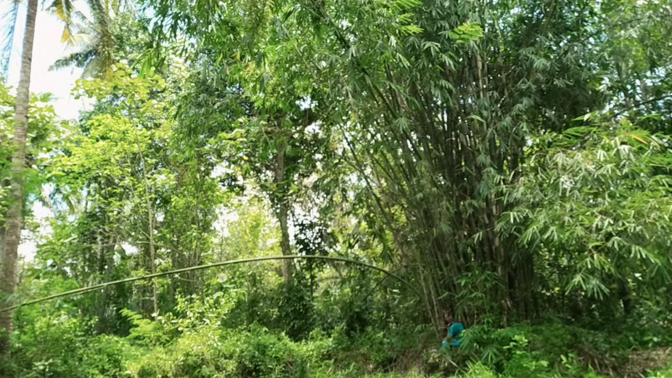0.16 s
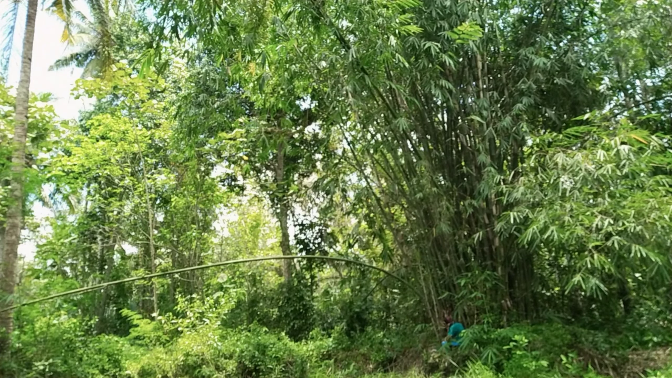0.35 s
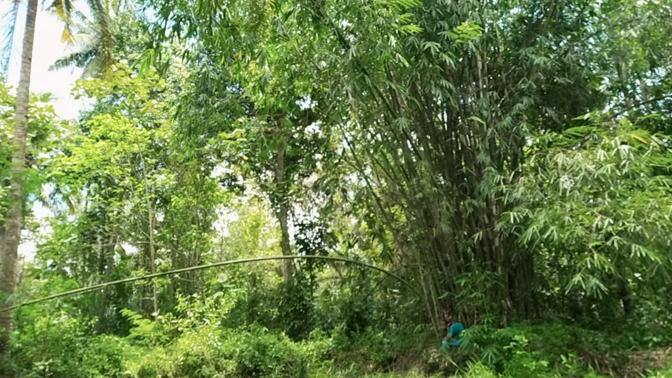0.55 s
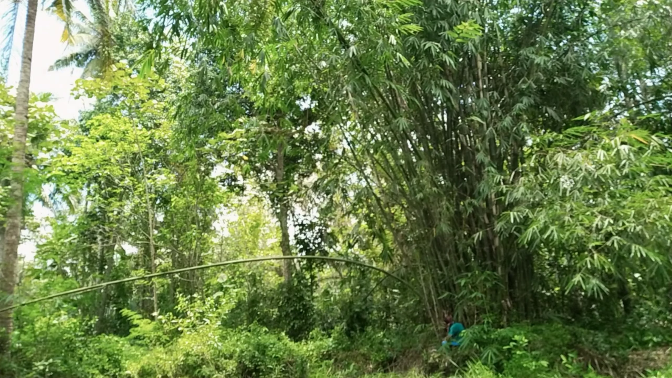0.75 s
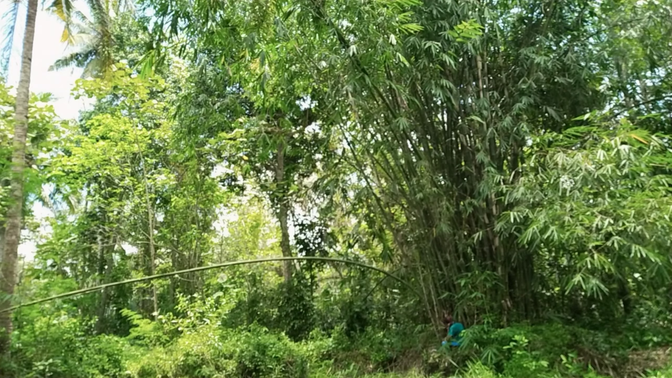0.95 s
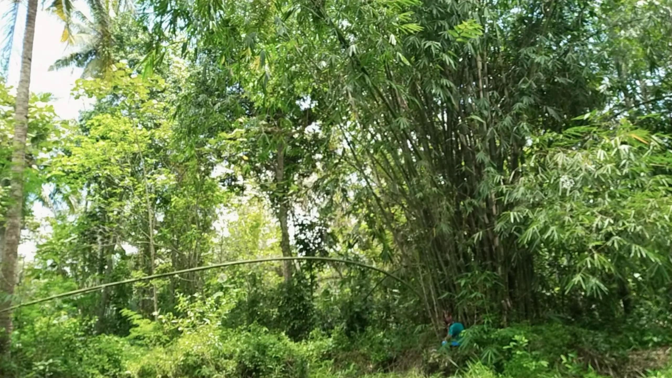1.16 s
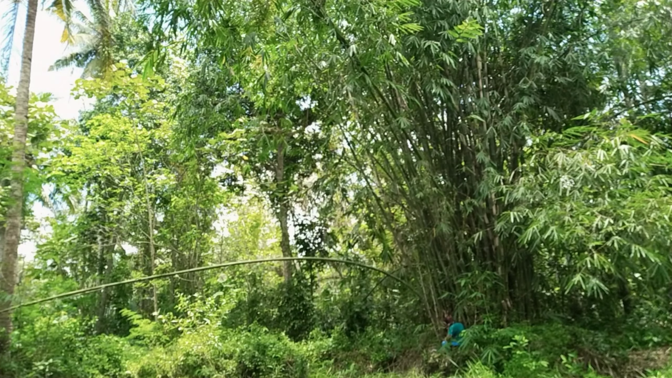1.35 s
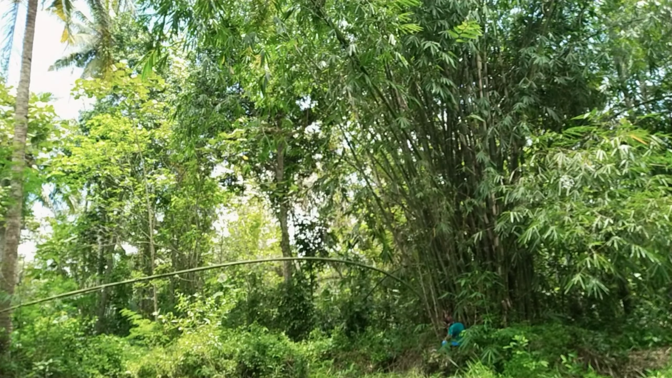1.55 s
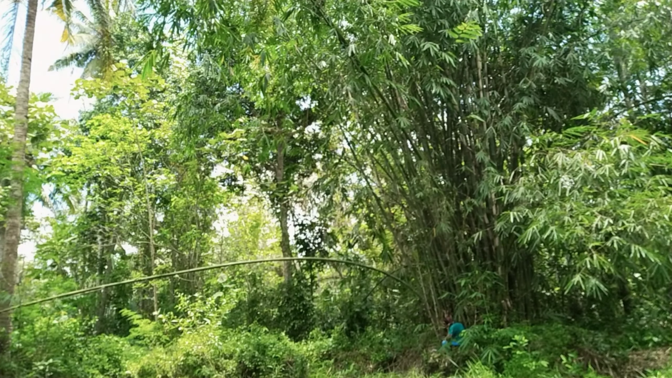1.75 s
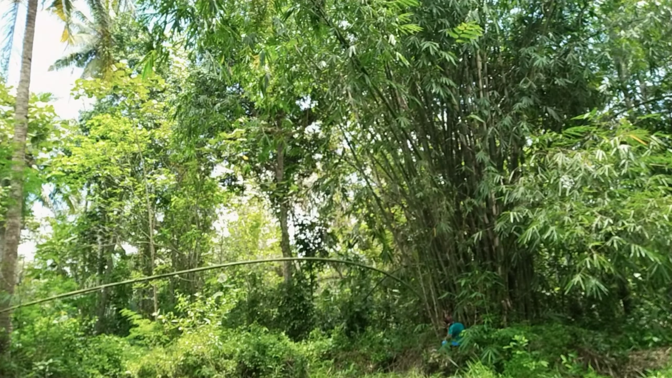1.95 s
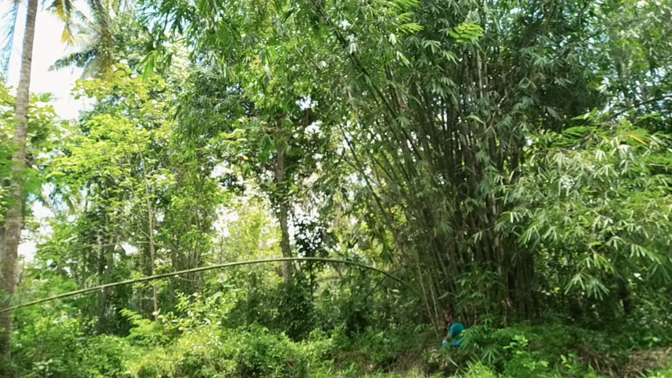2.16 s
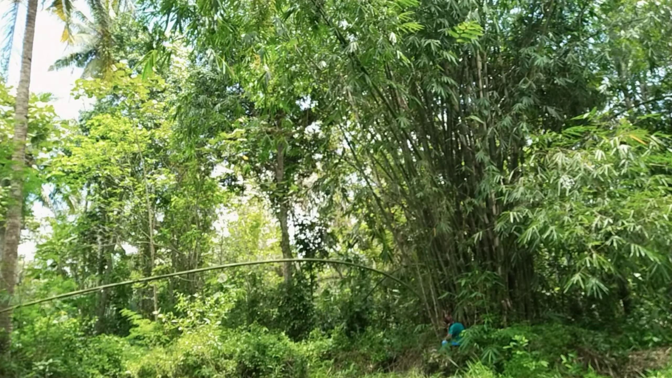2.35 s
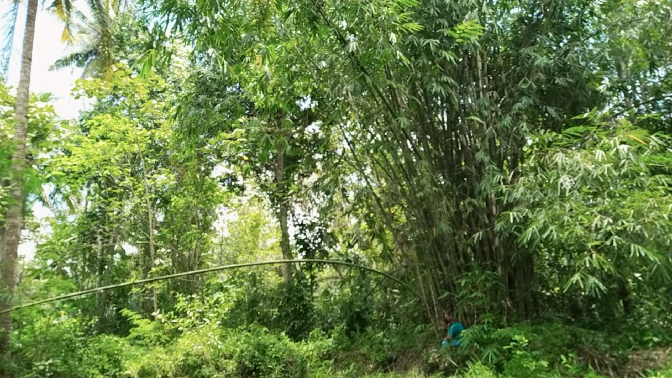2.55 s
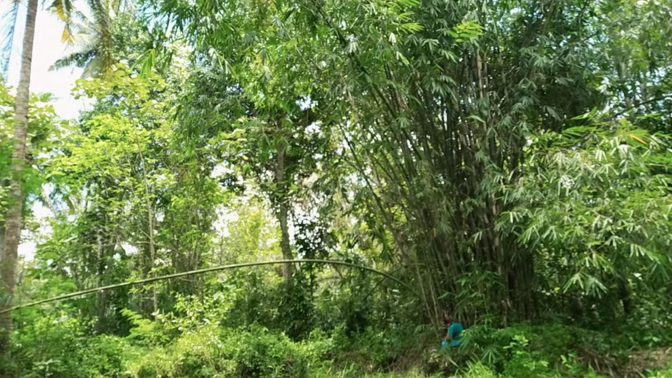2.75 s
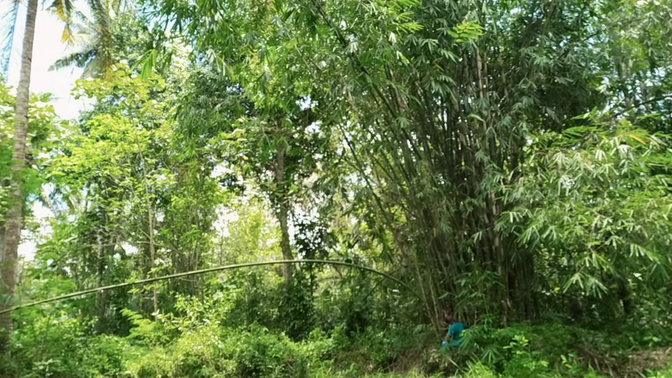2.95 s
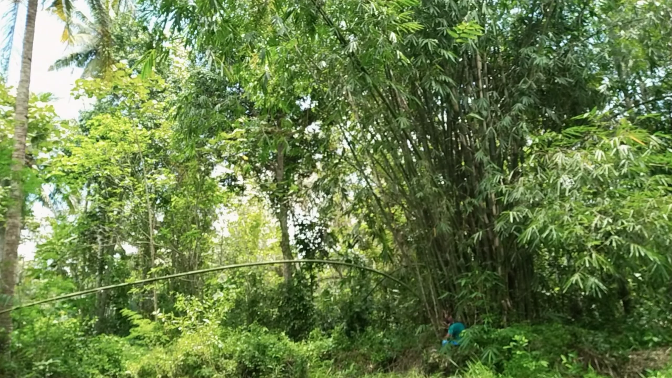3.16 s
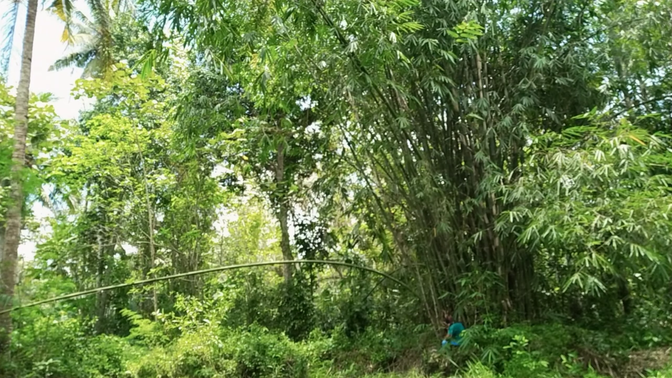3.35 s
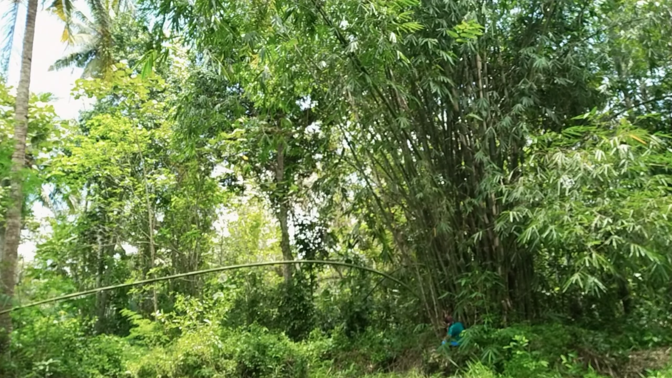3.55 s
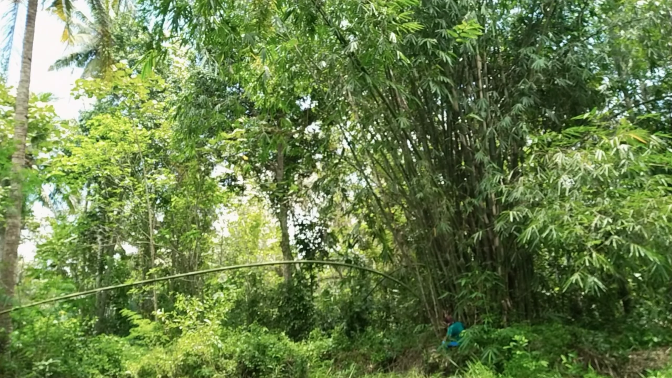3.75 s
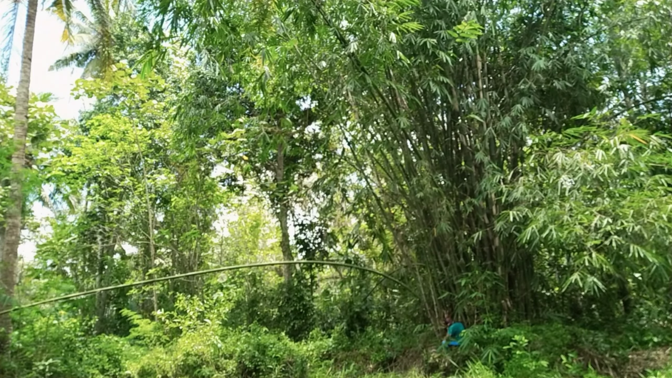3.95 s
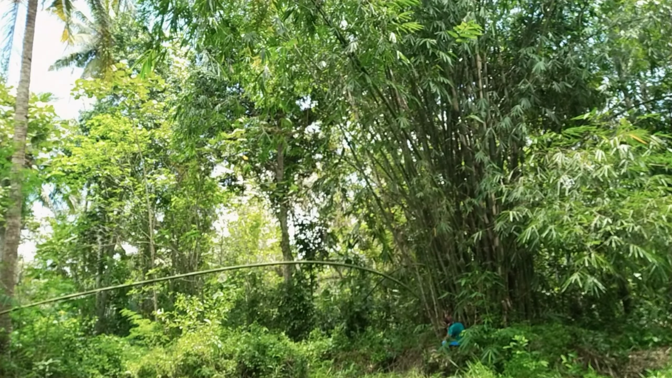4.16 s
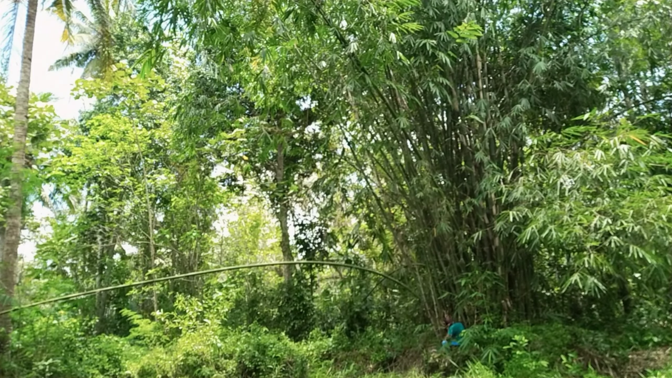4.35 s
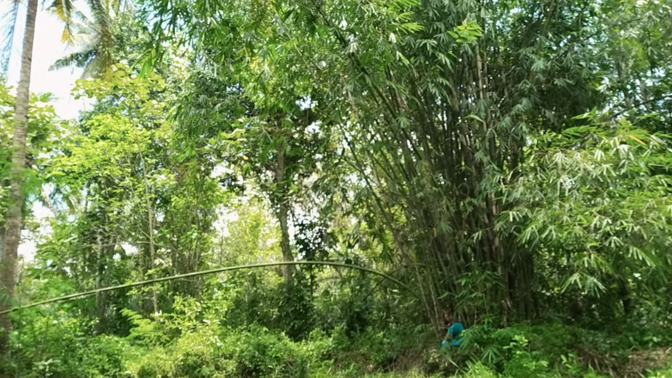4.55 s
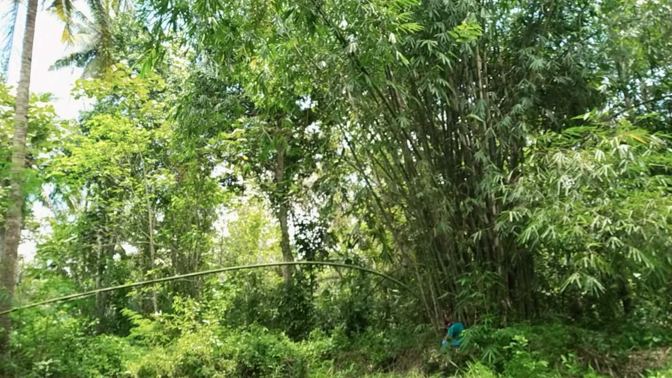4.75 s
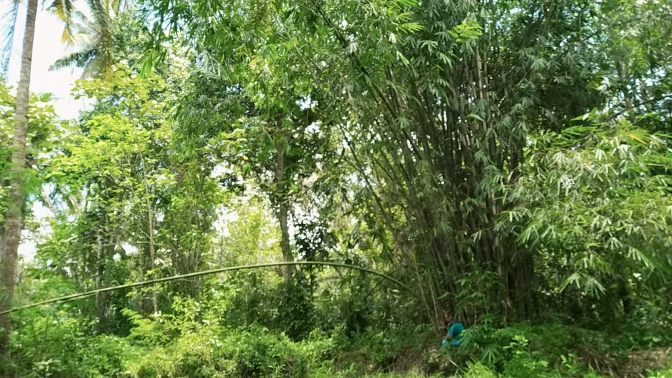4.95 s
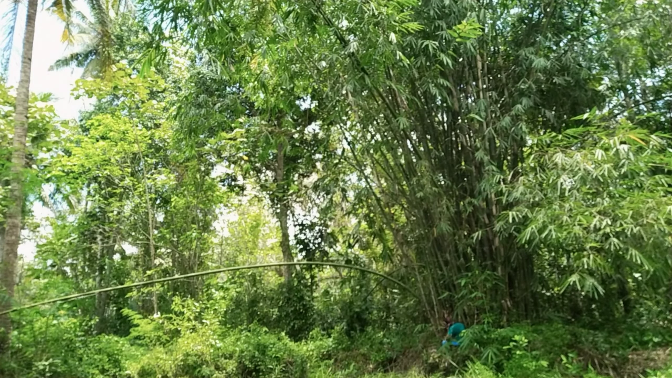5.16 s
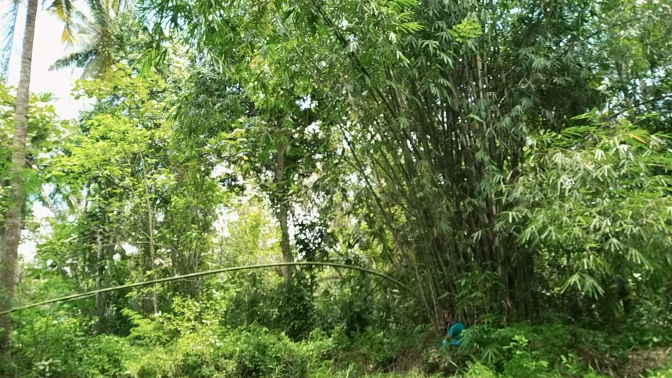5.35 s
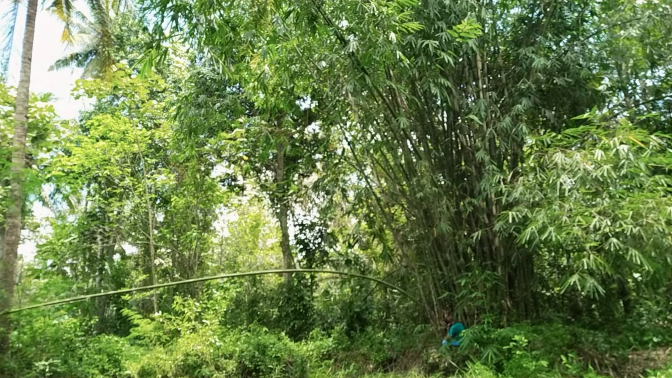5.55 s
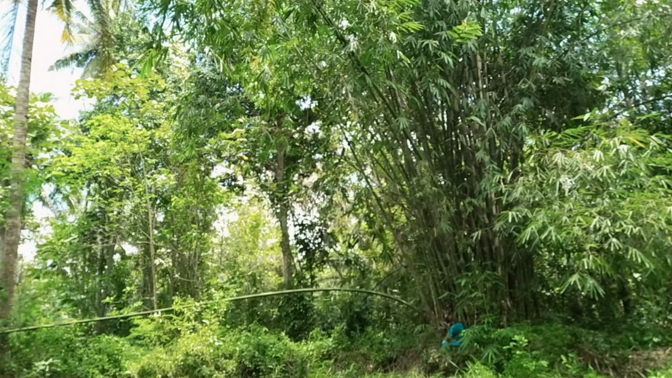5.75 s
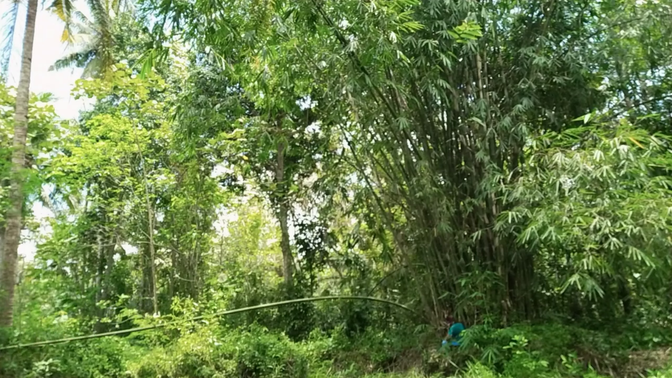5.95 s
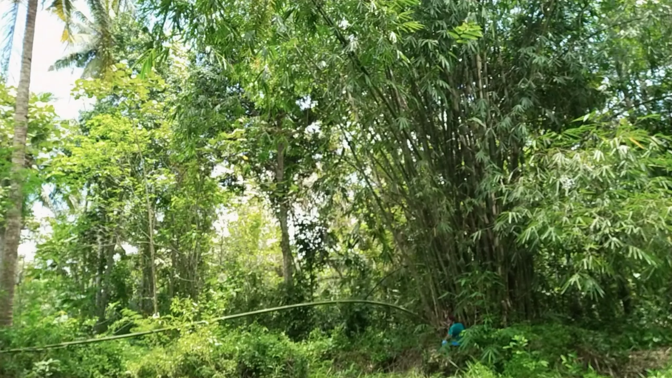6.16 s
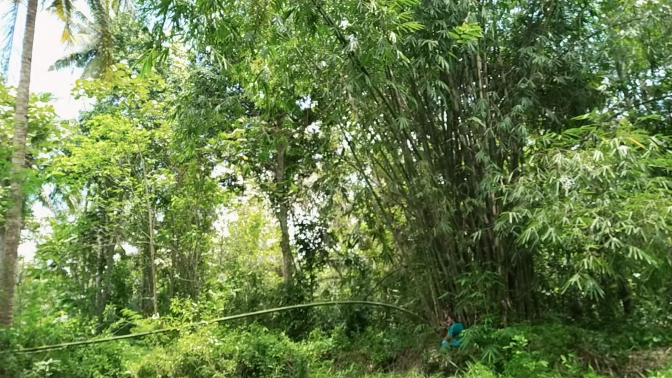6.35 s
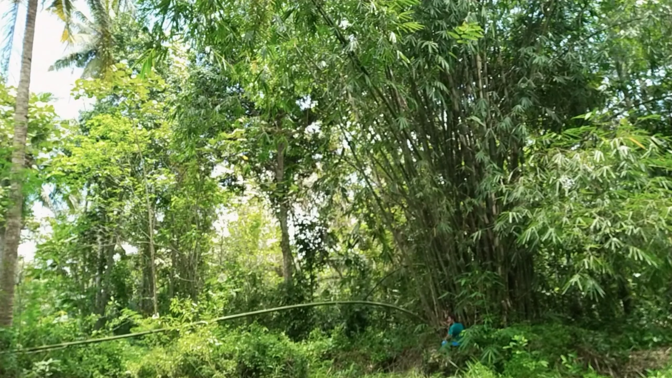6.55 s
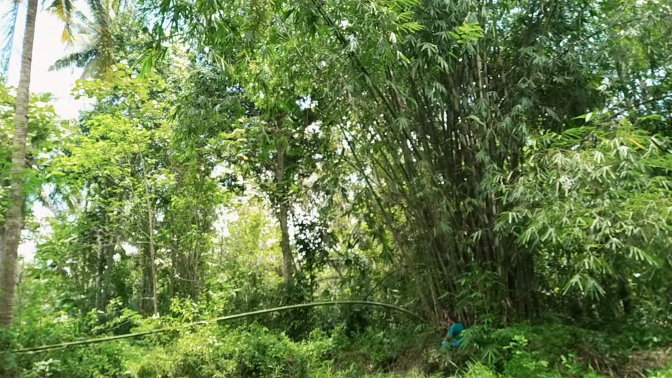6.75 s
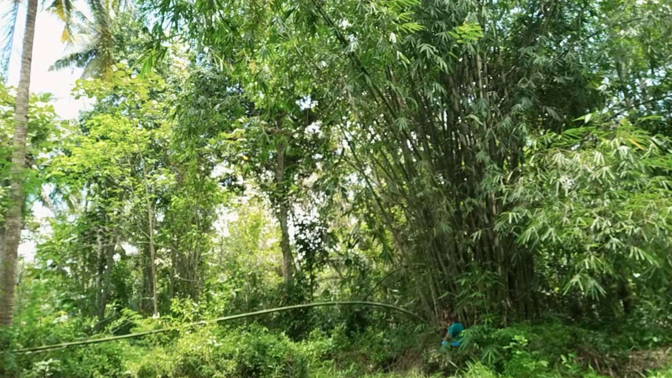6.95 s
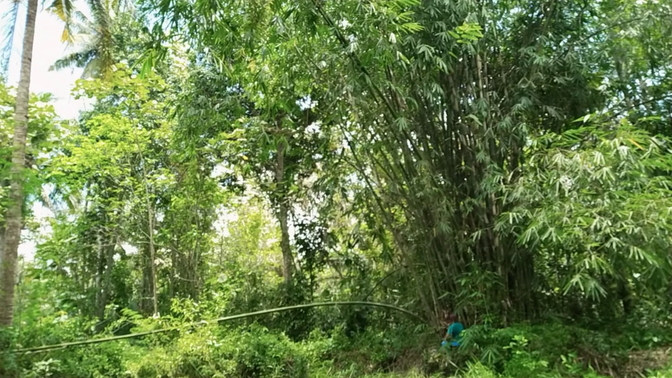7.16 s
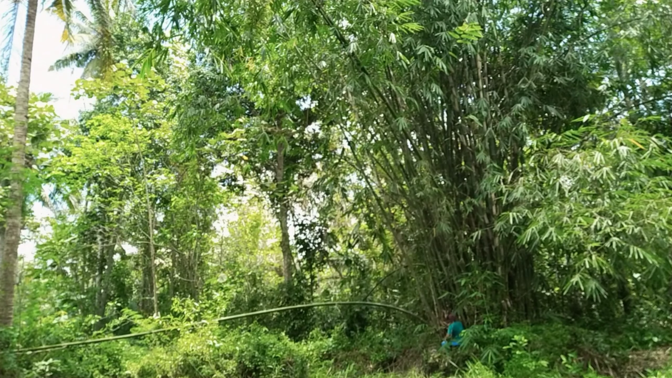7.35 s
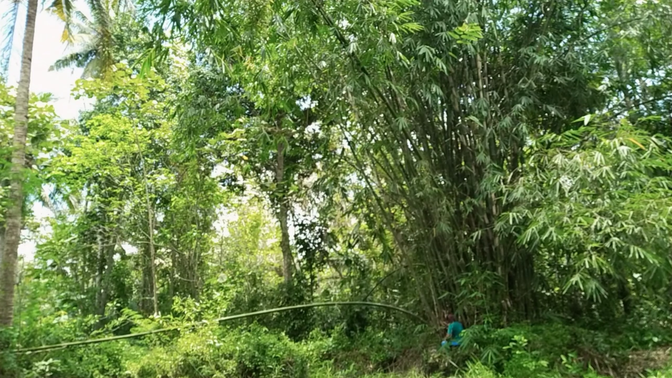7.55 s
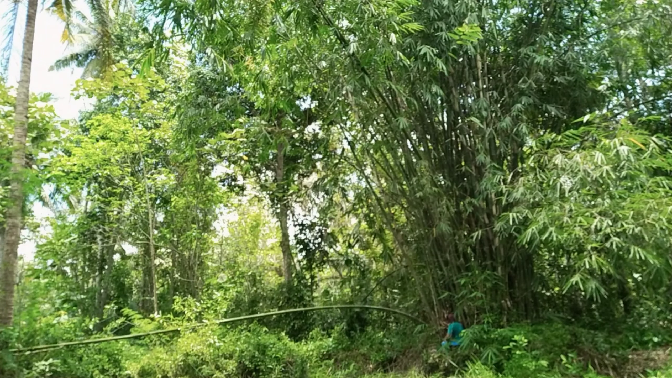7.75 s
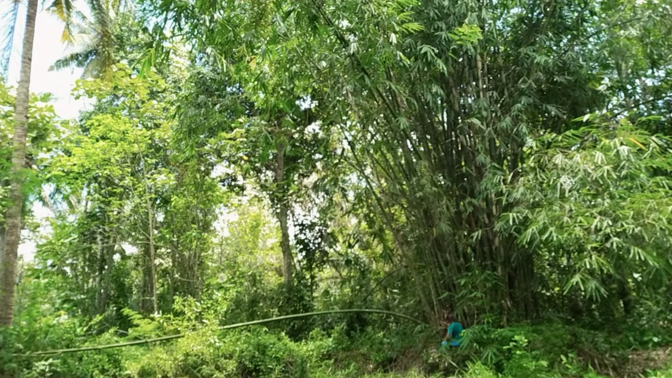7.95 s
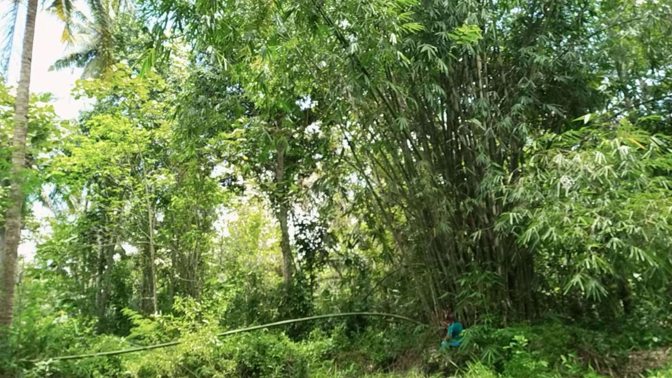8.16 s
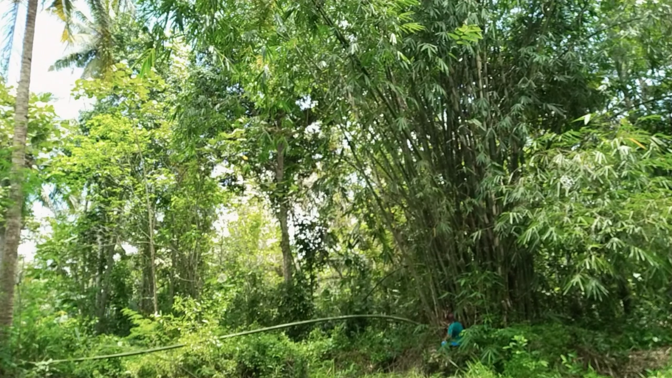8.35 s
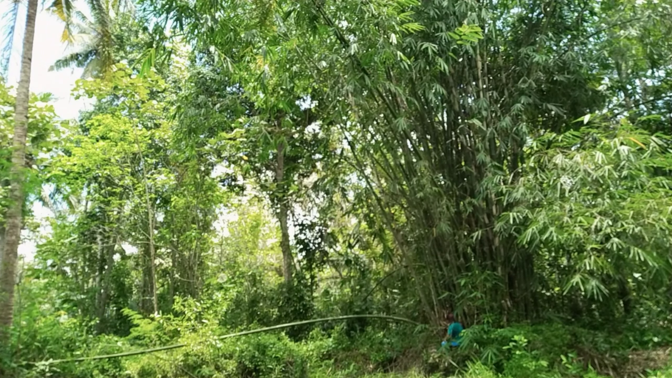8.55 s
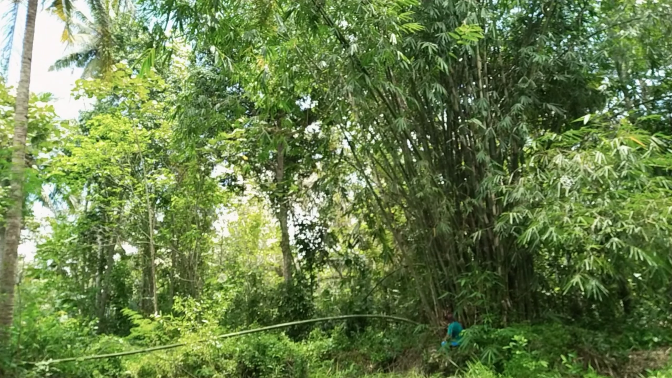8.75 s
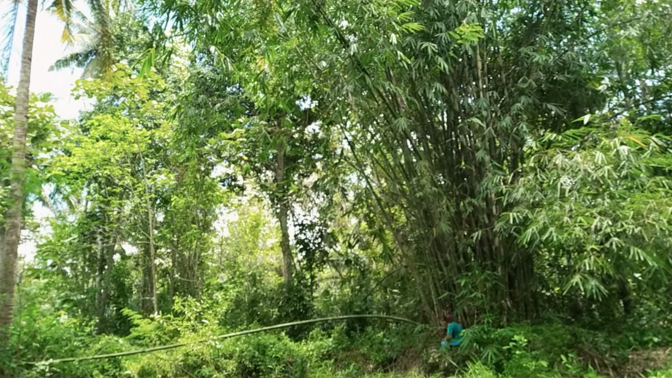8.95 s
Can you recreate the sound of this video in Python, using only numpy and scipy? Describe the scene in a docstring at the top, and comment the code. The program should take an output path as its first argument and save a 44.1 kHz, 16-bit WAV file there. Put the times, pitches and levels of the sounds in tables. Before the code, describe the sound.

A distant blade knocks bamboo about twice a second; the stem cracks, the background abruptly changes to near wind and cicadas, and one loud chop lands.

```python
"""A blade chops a standing bamboo culm: each blow is a noisy crack of fibres and a hollow knock of the tube.
Trunks and foliage scatter it into a short hiss. The chops come first from far off, the culm cracks and sags,
then the scene changes to a nearer spot, by shaken leaves and one hard blow. Around it are whistled birds,
pulsed-noise cicadas, crickets, a low drone, air and wind, a thin whine and a hum. One microphone feeds both
channels."""
import sys
import numpy as np
from scipy import signal
from scipy.fft import rfft, irfft, next_fast_len
from scipy.io import wavfile
from scipy.ndimage import uniform_filter1d, map_coordinates

SR = 44100
rng = np.random.default_rng(int(sys.argv[2]) if len(sys.argv) > 2 else 0)


def linear_from_db(decibels):
    """Turn decibels (scalar or array-like) into linear amplitude factors; 0 gives 1."""
    return 10 ** (np.asarray(decibels, float) / 20)


def store_wav(level_fs):
    """Save 16-bit WAV to argv[1]."""
    pcm = np.round(np.clip(np.atleast_2d(level_fs), -1, 1) * 32767)
    wavfile.write(sys.argv[1], SR, pcm.T.astype(np.int16))


N = 396900

MOVE_S = 5.855  # the moment the scene changes to the near spot
TOP_HZ = 15560  # band limit of the recorder
FAR_AIR_DB, FAR_CICADA_DB, FAR_CRICKET_DB = -71.5, -67, -80
NEAR_AIR_DB, NEAR_CICADA_DB = -65.5, -59.5
WHINE_DB, WHINE_DIP_DB = -63.5, 10  # level; dip for each unit of a random curve
FIZZ_DB = -5  # top of the rustle against its body
CHIP_S, CHIP_DROP = 0.015, 0.85  # length [s]; end pitch over start pitch
GRAIN_DB = 3  # each blow meets other fibres, which colour it with their own humps
CHOP_ANSWER_DB = -4  # how strongly the grove answers a chop
LESSER_KNOCK_DB = -41
NEAR_KNOCK_DB, KNOCK_PER_DULL = -25, 0.56  # the duller the contact, the more the tube knocks

# Colour of the distant village and breeze: (frequency [Hz], relative level per Hz [dB])
FAR_AIR_COLOUR = [(15, -48), (28, -14.5), (65, -4), (129, -8), (250, -11.5), (400, -20), (620, -30.5),
                  (1000, -25), (1600, -19), (2100, -23.5), (4300, -26), (5500, -30), (7800, -34),
                  (12000, -39.5), (16000, -33.5)]
# Colour of the air at the near spot: (frequency [Hz], relative level per Hz [dB])
NEAR_AIR_COLOUR = [(90, -27), (150, -1), (320, -18.5), (600, -10), (800, -3.5), (1000, -9), (2300, -11.5),
                   (4100, -24), (6500, -29.5), (8500, -23), (12000, -27), (16000, -33)]
# Colour of the wind at the near spot: (frequency [Hz], relative level per Hz [dB])
WIND_COLOUR = [(12, -53), (20, 3.5), (59, 12.5), (134, 4), (167, -12), (209, -14), (250, -22), (320, -17),
               (550, -120)]
# Wavering low drone of the far spot: (time [s], level [dB])
DRONE_LEVEL = [(0, -64.5), (1.6, -69), (2, -71), (3.4, -64.5), (3.7, -77), (4.3, -68.5), (4.8, -77),
               (5.85, -70)]
# Wind and cricket at the near spot: (time [s], wind level [dB], cricket level [dB])
NEAR_LEVELS = [(5.86, -57, -81), (6.4, -58.5, -81), (6.55, -58, -69.5), (6.85, -57.5, -74), (7.3, -61, -88),
               (8.2, -59.5, -85), (8.7, -58, -66), (9, -56, -89)]
# Tones of the whine: (wing beats from the main tone [count], relative level [dB])
WHINE_TONES = [(-2, -10), (-1, -22), (0, 0), (1, -16), (2, -20)]
# A brief wavering hum: (time [s], pitch [Hz], level [dB])
HUM_PATH = [(6.25, 700, -88), (6.42, 724, -62), (6.52, 773, -62), (6.7, 808, -67), (6.95, 812, -84),
            (7.2, 800, -90)]
# Colour of the rustle: (frequency [Hz], relative level per Hz [dB])
LEAF_COLOUR = [(300, -67), (500, -23), (800, -9), (1750, -5), (4150, -7), (6300, -10.5), (8300, -4),
               (9500, -10), (12000, -9), (16000, -5)]
# How hard the leaves shake: (time [s], level [dB])
SHAKE_LEVEL = [(5.33, -115), (5.42, -77), (5.54, -73), (5.85, -66.5), (5.86, -58), (6.07, -63),
               (6.3, -66.5), (6.5, -71), (6.9, -82.5), (7.5, -72.5), (7.65, -54.5), (7.72, -61.5),
               (8.09, -59.5), (8.25, -65), (8.5, -71.5), (9, -77)]

# Decay among the twigs around a bird: (frequency [Hz], t60 [s])
BRANCHES = [(3000, 0.026), (8000, 0.02)]
# Bird syllables, one whistle a row:
# (delay [s], length [s], start pitch [Hz], middle pitch [Hz], end pitch [Hz], relative level [dB])
HOOK = [(0, .011, 4400, 4620, 5200, 0), (.007, 0.016, 5180, 5210, 5220, -2)]
FLICK = [(0, .015, 4440, 5200, 4400, -0.5), (.017, .013, 3400, 4600, 5800, -0.5)]
DIVE = [(0, 0.0127, 5660, 4560, 4150, 0), (.01, .019, 4130, 3650, 2900, -8.5)]
FALL = [(0, .027, 4950, 3700, 3050, 0)]
CLOSE = [(0, .018, 4510, 4680, 4600, -1), (.034, 0.026, 4230, 4110, 3870, -8),
         (.064, .025, 5570, 5480, 5450, -15)]
SWOOP = [(0, .02, 6500, 7450, 6000, -3), (.02, .014, 6000, 7000, 8000, 2),
         (.035, .045, 7600, 5900, 5370, 1.5), (.07, .055, 5700, 5650, 5700, -10)]
# What the birds sing: (syllable, [(time [s], level [dB], pitch ratio)])
SONG = [(HOOK, [(3.622, -56, 1.04), (3.801, -52.5, 1.02), (3.975, -57, .975), (4.144, -55.5, .985)]),
        (FLICK, [(3.67, -52.5, 1.01), (3.842, -57.5, 1.0), (4.018, -59, .99), (4.189, -55.5, .99)]),
        (DIVE, [(3.749, -50.5, 1.0), (3.921, -51.5, 1.0), (4.096, -55, 0.98)]), (FALL, [(1.106, -67, 1.06),
        (1.289, -59.5, 1.0), (1.462, -62.5, 1.03), (2.51, -71, 1.0), (3.585, -65, 1.02),
        (5.069, -64.5, 0.93), (5.245, -61.5, 1.0)]), (CLOSE, [(4.318, -48.5, 0.99), (4.478, -48.5, 0.94)]),
        (SWOOP, [(.483, -64, 0.97)])]
# Short falling notes: (time [s], start pitch [Hz], level [dB])
CHIPS = [(.893, 5000, -71), (.93, 4800, -73), (.96, 4900, -73), (1.154, 5200, -65), (1.38, 4720, -65.5),
         (1.411, 5400, -63), (2.633, 4900, -71.5), (7.386, 4050, -63)]
# Level notes of further birds: (time [s], length [s], pitch [Hz], level [dB])
PEEPS = [(1.055, 0.11, 6000, -69), (1.26, .1, 6970, -70), (1.312, .035, 5290, -65.5),
         (1.35, .069, 6080, -67), (1.42, .06, 6150, -73), (1.455, .05, 7000, -73), (1.523, .03, 6990, -64),
         (1.58, .05, 6950, -74), (1.59, .077, 5400, -69), (1.804, .09, 6950, -69.5),
         (1.875, .053, 5350, -71), (1.909, .041, 5920, -66.5), (1.96, 0.097, 5970, -75),
         (2.03, .054, 7400, -74), (2.098, .062, 6960, -71), (2.878, .066, 3460, -74),
         (3.34, .055, 7050, -74), (7.377, 0.054, 3320, -63)]

# Hollow tube modes of the far culm, before small random shifts: (frequency [Hz], level [dB], t60 [s])
FAR_CULM = [(179, 7.5, 0.025), (347, -2, 0.049), (444, 8, 0.023), (514, -5, 0.045), (621, 1, 0.031)]
# Hollow tube modes of the near culm, before small random shifts: (frequency [Hz], level [dB], t60 [s])
NEAR_CULM = [(135, -2.5, 0.041), (196, -7.5, 0.072), (797, -1, 0.034), (853, -10, 0.084), (1135, 0, 0.024),
             (1343, 4.5, 0.023)]
# Colour of the far crack: (frequency [Hz], relative level per Hz [dB])
FAR_CRACK = [(300, -52), (700, -44), (850, -21), (1600, -2), (2500, 0), (3600, -1), (4600, 0.5), (6200, 1),
             (8000, -2), (11500, -5.5), (14800, -0.5), (16000, -60)]
# Colour of the near crack: (frequency [Hz], relative level per Hz [dB])
NEAR_CRACK = [(300, -33), (550, -20.5), (800, -9), (1100, -18), (1800, -10.5), (2700, -7.5), (4000, -18),
              (6800, -19), (8600, -3.5), (11000, -10.5), (16000, -12)]
# Decay of the scattered sound around the far spot: (frequency [Hz], t60 [s])
FAR_GROVE = [(400, .15), (1400, 0.26), (3700, 0.44), (8000, 0.3), (15000, 0.4)]
# Decay of the scattered sound around the near spot: (frequency [Hz], t60 [s])
NEAR_GROVE = [(400, 0.25), (1000, 0.49), (3000, 0.52), (8000, 0.57), (14000, 0.36)]
# Blade into the far culm: (time [s], level [dB], hollow knock [dB], treble [dB], crack time constant [ms])
CHOPS = [(0.1454, -29, -20, -7, 2), (0.6192, -27, -14, -8, 1.36), (1.1833, -26.5, -21, -5.5, 0.91),
         (1.6751, -25.5, -19.5, -2, 0.71), (2.1705, -32, -14.5, -5, 2.1), (3.1513, -28, -22.5, -4.5, 1.3),
         (3.9564, -27, -19, -2, 1.2), (4.4244, -24, -22, -1, 0.92), (4.8864, -23, -25, 3, .71),
         (5.3426, -25.5, -24, -14, 0.8)]
# The edge grazes the skin just before it bites: (time [s], level [dB])
TOUCHES = [(.139, -49), (3.1448, -41), (3.9503, -32), (4.8795, -35.5)]
# Shared by all touches: (hollow knock [dB], treble [dB], scattered answer [dB], crack time constant [ms])
TOUCH = (-30, -2, -4, 1.3)
# Lesser sounds of the far culm: a dull bounce, a tick before a chop, splitting fibres:
# (time [s], level [dB], treble [dB], scattered answer [dB], crack time constant [ms])
LESSER_SOUNDS = [(2.276, -34.5, -19, -2, 0.94), (5.3323, -43, 0, 9, 2.5), (5.4834, -33, -4, -1.5, 1.14),
                 (5.5374, -49, 1, 3, 1.5), (5.5787, -24.5, -3, -7, 0.3), (5.6081, -24.5, 2, 3.5, 0.73),
                 (5.6462, -43, 10, 8, 0.57)]
# Blows and snaps of the near culm:
# (time [s], level [dB], treble [dB], scattered answer [dB], crack time constant [ms])
NEAR_HITS = [(5.8684, -31.5, 13, -5, 2.9), (5.8884, -32, 5, 2, .36), (6.079, -48.5, -52, -3.5, 1.2),
             (7.45, -46, -3, -9, 3), (7.517, -21, -39.5, -6, 0.79), (7.5194, -14, -8.5, .5, 1.92),
             (7.5422, -18, -14, -23, 2.1), (7.64, -31, -18, -18, 2), (7.665, -25, -12.5, -.5, 0.98),
             (7.682, -28.5, -9.5, 3.5, 0.55), (8.1265, -35, -6, -5, 2.4), (8.2444, -43, 6, -5, .81),
             (8.8644, -46, 6, -4, 1.7)]


def unit(x):
    """Scales to rms 1."""
    return x / np.sqrt(np.mean(x ** 2) + 1e-20)


def along(points, hz):
    """Reads a curve of (frequency [Hz], value) points on a log axis."""
    f, v = np.transpose(points)
    return np.interp(np.log(hz + 1), np.log(f + 1), v)


def curves(rows):
    """Gives one value per sample for each column after the time."""
    s, *cols = np.transpose(rows)
    return [np.interp(np.arange(N) / SR, s, c) for c in cols]


def wobble(rate):
    """A smooth random curve with rate knots a second."""
    return map_coordinates(rng.standard_normal(int(N * rate / SR) + 4), [np.arange(N) * rate / SR])


def filtered(x, response):
    """Shapes x by a response of frequency."""
    m = next_fast_len(len(x) + 8192)
    return irfft(rfft(x, m) * response(np.fft.rfftfreq(m, 1 / SR)), m)[:len(x)]


def rush(spectrum, patchy_db):
    """Coloured noise of rms 1, with patches of random gain in time and frequency."""
    z = signal.stft(rng.standard_normal(N), nperseg=512)[2]
    patches = uniform_filter1d(rng.standard_normal(z.shape), size=6, axis=0)
    patches = uniform_filter1d(patches, size=12, axis=1)
    x = signal.istft(z * linear_from_db(patchy_db * unit(patches)), nperseg=512)[1][:N]
    return unit(filtered(x, lambda hz: linear_from_db(along(spectrum, hz))))


def band_rms(x, lo_hz, hi_hz):
    """Scales x so that one band has rms 1."""
    part = filtered(x, lambda hz: (hz > lo_hz) & (hz < hi_hz))
    return x / np.sqrt(np.mean(part ** 2))


def bell(hz, centre_hz, width_hz):
    """A steep-sided resonance."""
    return 1 / (1 + ((hz - centre_hz) / width_hz) ** 2) ** 2


def add(out, s, x):
    """Mixes x into out at a time in seconds."""
    part = out[round(s * SR):][:len(x)]
    part += x[:len(part)]


def grove(decay, length, rise_s):
    """A new diffuse answer of trunks and leaves, energy 1; each frequency dies at its own speed."""
    _, t, z = signal.stft(rng.standard_normal(length), SR, nperseg=128)
    hz = np.fft.rfftfreq(128, 1 / SR)
    fading = z * linear_from_db(-60 * t / along(decay, hz)[:, None])
    tail = signal.istft(fading, SR, nperseg=128)[1][:length]
    tail = tail * (1 - np.exp(-np.arange(length) / SR / rise_s))
    return tail / np.linalg.norm(tail)


def cicada(clicks_hz, swell_hz, swell_db, scatter, resonance):
    """Tymbal clicks at an unsteady rate ring the body and swell in a slower beat."""
    cycle = np.cumsum(clicks_hz * (1 + 0.05 * wobble(6))) / SR
    gate = np.exp(-(cycle % 1) / 0.52) + scatter  # echoes fill the gaps between clicks
    beat = np.cumsum(swell_hz * (1 + 0.04 * wobble(1.5))) / SR
    swell = linear_from_db(swell_db * np.sin(2 * np.pi * beat))
    return unit(swell * filtered(gate * rng.standard_normal(N), resonance))


def drone():
    """A wavering low drone: noise through two low resonances."""
    level_db, = curves(DRONE_LEVEL)
    tone = filtered(rng.standard_normal(N), lambda hz: bell(hz, 132.6, 22) + 0.49 * bell(hz, 188, 22))
    return linear_from_db(level_db) * unit(tone)


def far_cricket():
    """A high tone and its octave, fluttering in pitch and level."""
    phase = 2 * np.pi * np.cumsum(6480 + 28 * wobble(60)) / SR
    flutter = linear_from_db(2.5 * wobble(2.5) + 3 * wobble(14) + 2.5 * wobble(90))
    return linear_from_db(FAR_CRICKET_DB) * flutter * (np.sin(phase) + linear_from_db(-9) * np.sin(2 * phase))


def far_spot():
    """Smooth distant air, a wavering low drone, a hissing cicada and a cricket with its octave."""
    air = band_rms(rush(FAR_AIR_COLOUR, patchy_db=0.5), 1000, 2500)
    body = lambda hz: bell(hz, 10480, 700) + 0.38 * bell(hz, 9600, 600)
    hiss = cicada(clicks_hz=190, swell_hz=15, swell_db=2.1, scatter=1.0, resonance=body)
    return linear_from_db(FAR_AIR_DB) * air + drone() + linear_from_db(FAR_CICADA_DB) * hiss + far_cricket()


def whine():
    """A pure tone that drifts up and down every second and a half, with side tones spaced by the wing beat."""
    t = np.arange(N) / SR
    pitch_hz = 13650 + 72 * np.cos(2 * np.pi * (t - 7.15) / 1.5) + 10 * wobble(45)
    phase = 2 * np.pi * np.cumsum(pitch_hz) / SR
    wing = 2 * np.pi * 170 * t
    tones = sum(linear_from_db(db + 1.8 * wobble(28)) * np.sin(phase + step * wing) for step, db in WHINE_TONES)
    level_db = WHINE_DB - WHINE_DIP_DB * np.maximum(wobble(26), 0)  # brief dips
    return np.sqrt(2) * linear_from_db(level_db) * tones


def hum():
    """A fuzzy tone that rises and fades, its pitch and level shaken at random."""
    pitch_hz, db = curves(HUM_PATH)
    phase = 2 * np.pi * np.cumsum(pitch_hz + 30 * wobble(35)) / SR
    return linear_from_db(db + 1.8 * wobble(40)) * np.sin(phase)


def near_spot():
    """Gusty wind, fuller air, a throbbing cicada, a faint low cricket, a whine and a hum."""
    wind_db, cricket_db = curves(NEAR_LEVELS)
    wind = unit(linear_from_db(2.6 * wobble(9)) * rush(WIND_COLOUR, patchy_db=0.5))
    air = band_rms(rush(NEAR_AIR_COLOUR, patchy_db=1.3), 580, 1024)
    body = lambda hz: bell(hz, 5350, 540) + 0.41 * bell(hz, 5670, 220) + 0.2 * bell(hz, 10060, 600)
    throb = cicada(clicks_hz=104, swell_hz=8.3, swell_db=3.0, scatter=0.62, resonance=body)
    cricket = unit(filtered(rng.standard_normal(N), lambda hz: bell(hz, 3392, 85)))
    weather = linear_from_db(wind_db) * wind + linear_from_db(NEAR_AIR_DB) * air
    insects = linear_from_db(NEAR_CICADA_DB) * throb + linear_from_db(cricket_db) * cricket
    return weather + insects + whine() + hum()


def notes():
    """Lists every bird note as (time [s], length [s], start, middle and end pitch [Hz], level [dB])."""
    sung = [(s + delay, length, a * key, b * key, c * key, db + more_db)
            for syllable, rows in SONG
            for s, db, key in rows
            for delay, length, a, b, c, more_db in syllable]
    chips = [(s, CHIP_S, hz, hz * (1 + CHIP_DROP) / 2, hz * CHIP_DROP, db) for s, hz, db in CHIPS]
    peeps = [(s, length, hz, hz, hz, db) for s, length, hz, db in PEEPS]
    return sung + chips + peeps


def birds():
    """Bent, fluttering whistles that start fast and die away; each finds its own paths through the foliage."""
    out = np.zeros(N)
    flutter_hz, waver = 75 * wobble(220), linear_from_db(2.5 * wobble(160))
    for s, length, start_hz, middle_hz, end_hz, db in notes():
        u = np.arange(round(length * SR)) / (length * SR)
        here = slice(round(s * SR), round(s * SR) + len(u))
        bend = 4 * u * (1 - u) * (middle_hz - (start_hz + end_hz) / 2)
        pitch = start_hz + (end_hz - start_hz) * u + bend + flutter_hz[here]
        throat = 0.8 + 0.45 * bell(pitch, 4500, 400)  # favours one pitch
        envelope = np.sin(np.pi * u ** 0.8) ** 0.48
        whistle = np.sin(2 * np.pi * np.cumsum(pitch) / SR)
        note = np.sqrt(2) * linear_from_db(db) * throat * waver[here] * envelope * whistle
        twigs = linear_from_db(-3) * grove(BRANCHES, SR // 4, rise_s=0.002)
        paths = twigs + linear_from_db(-5.5) * grove(FAR_GROVE, SR // 4, rise_s=0.004)
        paths[0] = 0.7  # the direct sound
        add(out, s, signal.fftconvolve(note, paths))
    return out


def leaves():
    """The sagging culm shakes its leaves: dense small ticks over a hiss."""
    shake_db, = curves(SHAKE_LEVEL)
    strength = linear_from_db(3 * np.minimum(rng.exponential(size=N), 3))
    ticks = strength * (rng.random(N) < 0.02) * rng.standard_normal(N)
    ticks = unit(filtered(ticks, lambda hz: linear_from_db(along(LEAF_COLOUR, hz))))
    rustle = rush(LEAF_COLOUR, patchy_db=1.5) + 0.3 * ticks
    high = lambda hz: 1 / (1 + (10500 / (hz + 1)) ** 8)
    fizz = band_rms(filtered(rustle, high), 11300, 13000)
    body = band_rms(filtered(rustle, lambda hz: 1 - high(hz)), 6500, 9300)
    return linear_from_db(shake_db) * (linear_from_db(FIZZ_DB) * fizz + body)


def far_blows():
    """Lists all sounds of the far culm as (time [s], level, knock, treble, answer [dB], crack [ms])."""
    touches = [(s, db, *TOUCH) for s, db in TOUCHES]
    bites = [(s, db, knock_db, treble_db, CHOP_ANSWER_DB, ms) for s, db, knock_db, treble_db, ms in CHOPS]
    lesser = [(s, db, LESSER_KNOCK_DB, *rest) for s, db, *rest in LESSER_SOUNDS]
    return touches + bites + lesser


def near_blows():
    """Lists the near hits in the same form, their knock following their dullness."""
    return [(s, db, NEAR_KNOCK_DB - KNOCK_PER_DULL * treble_db, treble_db, *rest)
            for s, db, treble_db, *rest in NEAR_HITS]


def fibre_tilt(colour, treble_db):
    """The response of one blow: crack colour, its own random humps and a treble slope."""
    humps = rng.standard_normal(48)
    hump_hz = np.linspace(0, SR / 2, len(humps))
    slope = [(5500, 0), (10000, treble_db)]
    return lambda hz: linear_from_db(GRAIN_DB * np.interp(hz, hump_hz, humps) + along(colour, hz) + along(slope, hz))


def hollow_knock(culm, t):
    """The tube's modes ring as decaying sines, each blow at slightly other pitches and levels."""
    ring = np.zeros(len(t))
    for hz, level_db, t60 in culm:
        more_db, detune = rng.normal(0, 2), rng.normal(1, 0.015)
        ring += linear_from_db(level_db + more_db - 60 * t / t60) * np.sin(2 * np.pi * hz * detune * t)
    return ring * (1 - np.exp(-t / 0.0035))


def chops(blows, culm, colour, decay, wet_db, echo_s, echo_db):
    """Each blow cracks fibres and knocks the tube; a near trunk throws it back and the grove scatters it."""
    out, t = np.zeros(N), np.arange(SR // 8) / SR
    for s, db, knock_db, treble_db, answer_db, crack_ms in blows:
        u = t * 1000 / max(crack_ms, 0.2)
        tilt = fibre_tilt(colour, treble_db)
        snaps = linear_from_db(2.5 * rng.standard_normal((2, len(t))))  # uneven fibre snaps
        splinters = rng.standard_normal((2, len(t))) * snaps
        crack = filtered(splinters[0] * u * np.exp(1 - u), tilt)
        # peak near 1 whatever its length
        crack = crack * np.sqrt(crack_ms * SR / 4000) / np.linalg.norm(crack)
        knock = linear_from_db(knock_db) * hollow_knock(culm, t)
        add(out, s, linear_from_db(db) * (crack + knock))

        size = np.linalg.norm(crack)
        echo = filtered(splinters[1] * u * np.exp(-u / 2.34), lambda hz: tilt(hz) / (1 + (hz / 6000) ** 2))
        add(out, s + echo_s, linear_from_db(db + echo_db + answer_db) * size * echo / np.linalg.norm(echo))

        answer = grove(decay, SR * 3 // 4, rise_s=0.00052)
        lump_at = np.arange(len(answer)) * 180 / SR
        lumps = linear_from_db(1.3 * map_coordinates(rng.standard_normal(160), [lump_at]))  # single trunks stand out
        hiss = filtered(answer * lumps, tilt)  # the scattered hiss keeps the colour of the crack
        hiss = size * hiss / np.linalg.norm(hiss)
        scattered_knock = signal.fftconvolve(knock, answer)[:len(hiss)]
        add(out, s, linear_from_db(db + wet_db + answer_db) * (hiss + scattered_knock))
    return out


def scene():
    """The far spot gives way to the near one within a few milliseconds; birds and leaves span both."""
    near = np.clip((np.arange(N) / SR - MOVE_S) / 0.0023, 0, 1)
    far_chops = chops(far_blows(), FAR_CULM, FAR_CRACK, FAR_GROVE, wet_db=1.5, echo_s=0.011, echo_db=-5.5)
    near_chops = chops(near_blows(), NEAR_CULM, NEAR_CRACK, NEAR_GROVE, wet_db=2.5, echo_s=0.009, echo_db=-7)
    far = far_spot() + far_chops
    close = near_spot() + near_chops
    sound = (1 - near) * far + near * close + birds() + leaves()
    return np.tile(sound, (2, 1))


def band_limit(x):
    """A steep low-pass at the top of the band."""
    return signal.sosfilt(signal.butter(12, 16650, fs=SR, output="sos"), x)


def record(dry):
    """The recorder keeps nothing above its band limit."""
    limited = np.array([filtered(x, lambda hz: hz < TOP_HZ) for x in dry])
    return band_limit(limited)


dry = scene()
out = record(dry)
store_wav(out)
```